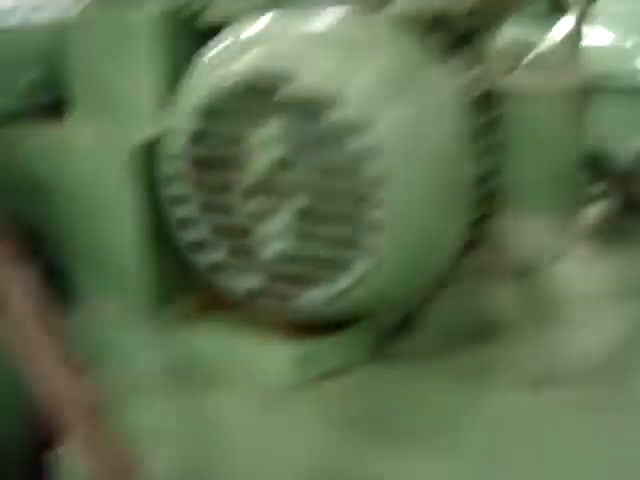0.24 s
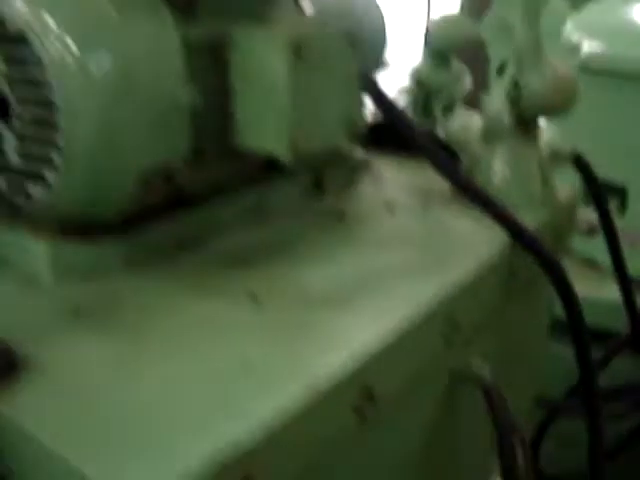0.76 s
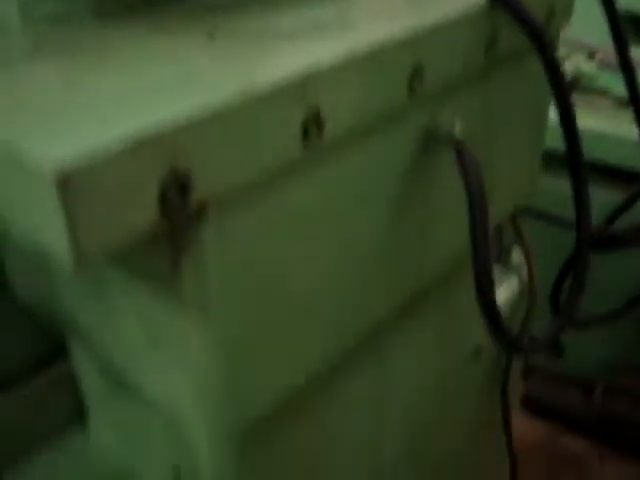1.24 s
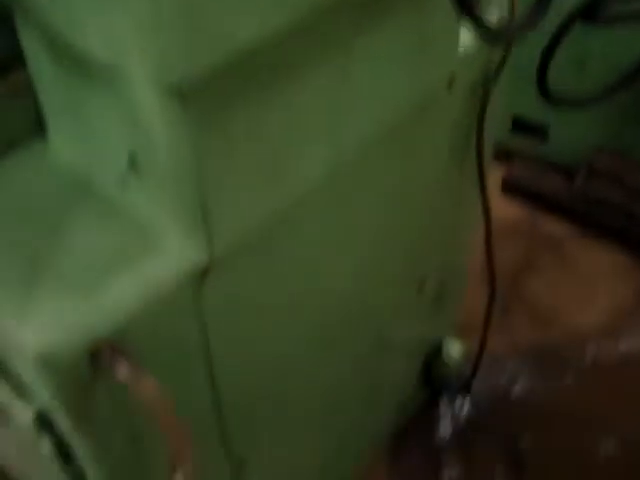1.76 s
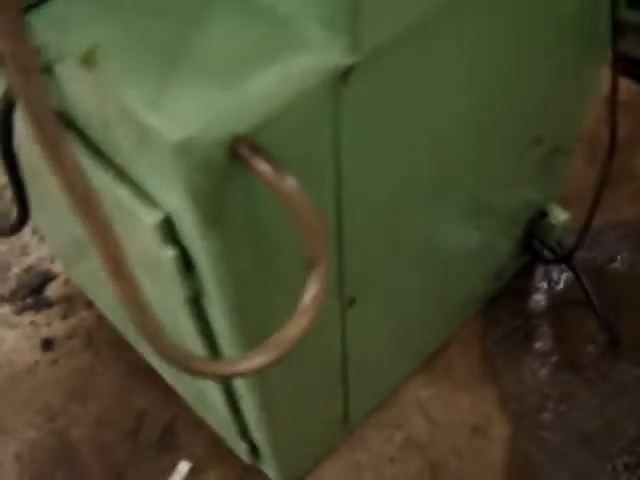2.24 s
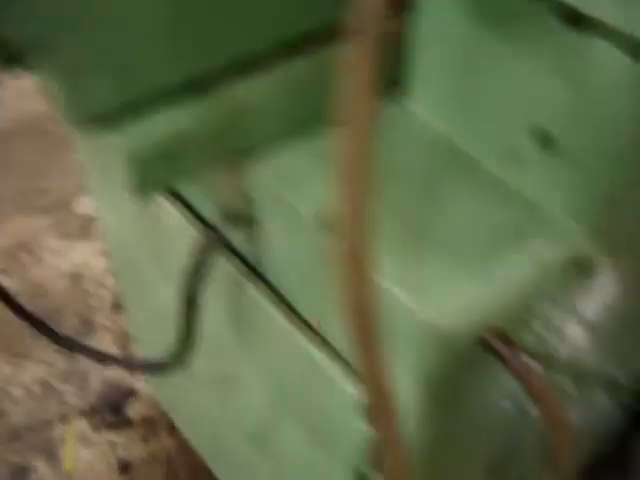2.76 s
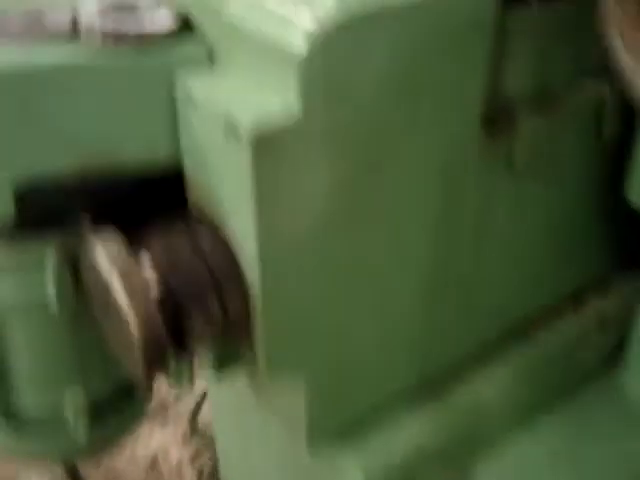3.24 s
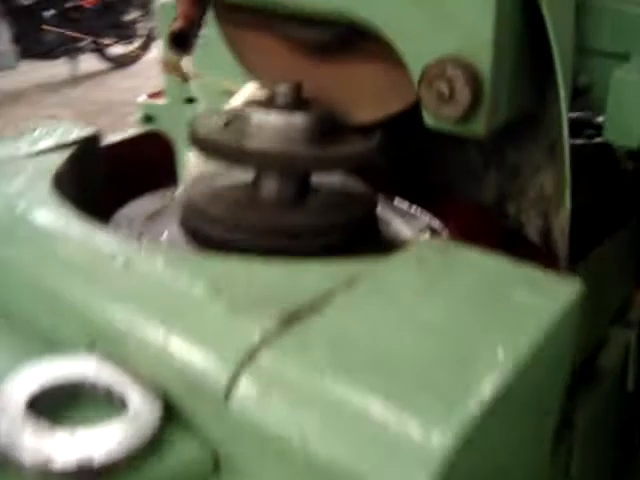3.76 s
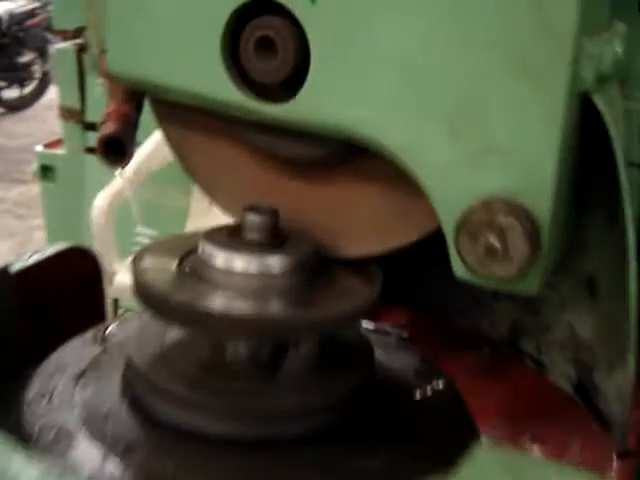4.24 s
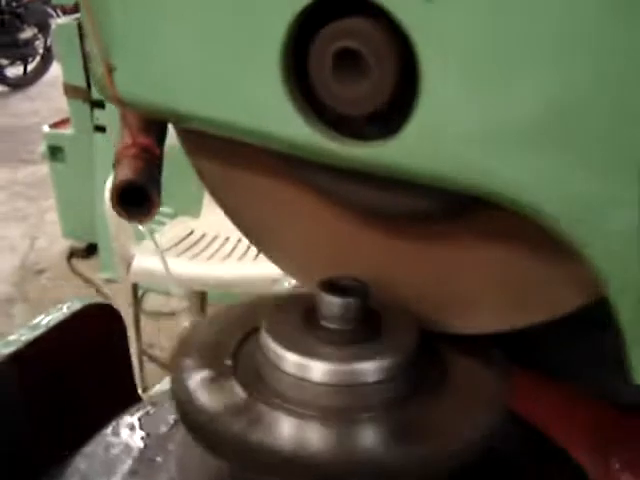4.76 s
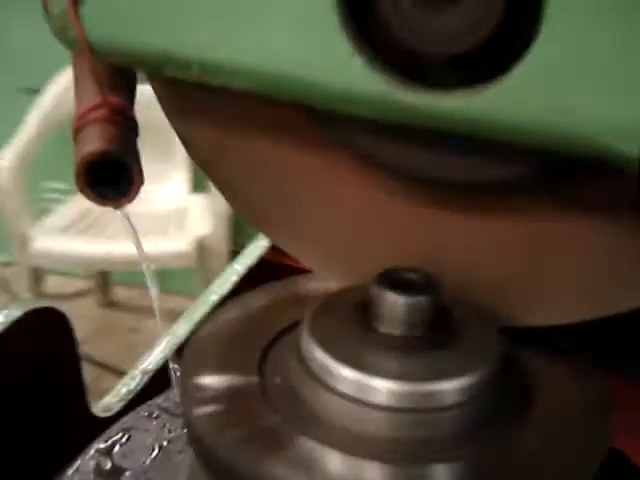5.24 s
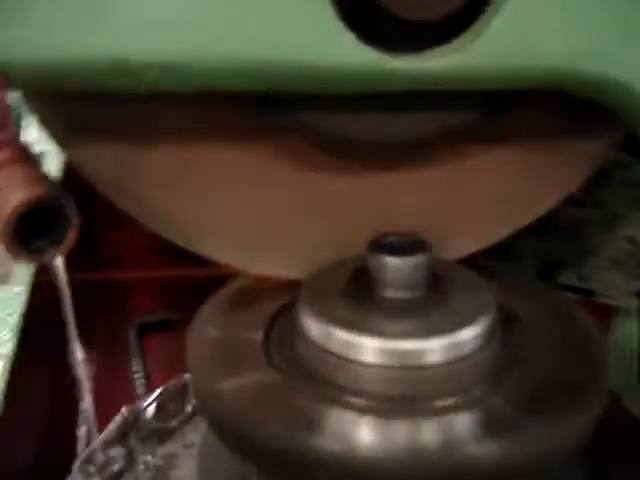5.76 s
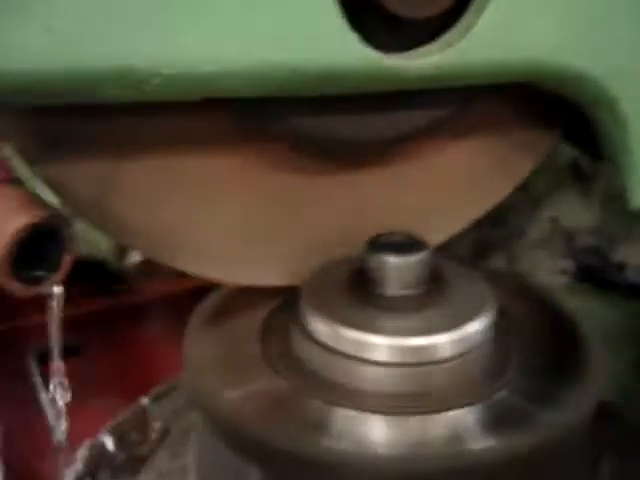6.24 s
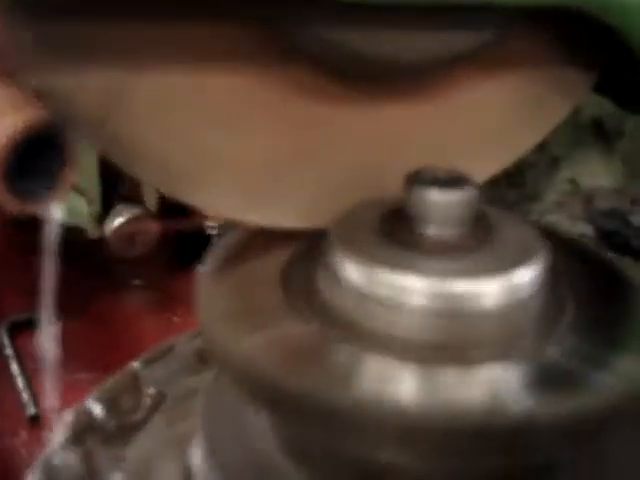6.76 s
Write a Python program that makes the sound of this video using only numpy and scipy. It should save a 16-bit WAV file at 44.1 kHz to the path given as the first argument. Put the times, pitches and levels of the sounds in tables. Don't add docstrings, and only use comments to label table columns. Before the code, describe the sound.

A grinding machine runs steadily in a workshop, its bright gritty wheel hiss over pump whine, casing drone and several held tones that swell and fade.

```python
import sys
import numpy as np
from scipy import signal
from scipy.fft import rfft, irfft, next_fast_len
from scipy.io import wavfile
from scipy.ndimage import uniform_filter1d, map_coordinates

SR = 44100
rng = np.random.default_rng(int(sys.argv[2]) if len(sys.argv) > 2 else 0)


def store_wav(level_fs):
    pcm = np.round(np.clip(np.atleast_2d(level_fs), -1, 1) * 32767)
    wavfile.write(sys.argv[1], SR, pcm.T.astype(np.int16))


def gain_from_decibels(decibels):
    exponent = np.asarray(decibels, float) / 20
    return 10 ** exponent


N = 309141
T_S = np.arange(N) / SR
BELT_HZ = 19.0

# t/s, near the wheel/0-1, beside the tank/0-1, guard opening in view/0-1
WALK = [(0, 0.4, .65, 0.62), (.5, 0.34, 0.56, 0.3), (1, 0.25, 0.69, 0.2), (1.5, .2, 0.81, 0.37),
        (2, 0.12, 0.87, 0.08), (2.4, 0, 0.86, 0.25), (2.8, 0.24, 1, 0.46), (3.15, 0.34, 0.75, 0.62),
        (3.5, .5, 0.56, 0.86), (3.85, 0.52, 0.36, 0.78), (4.2, 0.69, 0.44, 0.9), (4.55, 0.46, 0.14, 0.89),
        (4.9, 0.31, 0, 0.7), (5.25, .75, 0.08, 0.61), (5.6, 0.89, 0, .3), (6, 0.97, 0, 0.01),
        (6.4, 0.84, .03, 0.67), (7, 0.92, 0.22, 0.6)]


def unit(x):
    return x / np.sqrt(np.mean(x ** 2) + 1e-20)


def curves(rows):
    t_s, *columns = np.transpose(rows)
    return [np.interp(T_S, t_s, column) for column in columns]


def wobble(rate_hz):
    steps = np.arange(0, N + 32, 32)
    knots = rng.standard_normal(int(N * rate_hz / SR) + 4)
    return np.interp(np.arange(N), steps, map_coordinates(knots, [steps * rate_hz / SR]))


def filtered(x, response):
    m = next_fast_len(N + 8192)
    f_hz = np.fft.rfftfreq(m, 1 / SR) + 1
    return unit(irfft(rfft(x, m) * response(f_hz), m)[:N])


def shape(points):
    f_hz, db = np.transpose(points)
    return lambda hz: gain_from_decibels(np.interp(np.log(hz), np.log(f_hz), db))


def mode(hz, width_hz):
    return lambda f: (1j * f * width_hz / (hz * hz - f * f + 1j * f * width_hz)) ** 2


def patchy(depth_db):
    z = signal.stft(rng.standard_normal(N), nperseg=512)[2]
    field = uniform_filter1d(rng.standard_normal(z.shape), 3, 0)
    field = uniform_filter1d(field, 12, 1)
    return signal.istft(z * gain_from_decibels(depth_db * unit(field)), nperseg=512)[1][:N]


def tone(turns, db, flutter):
    sway_rad = flutter * wobble(14)
    gain = np.sqrt(2) * gain_from_decibels(db + 2.4 * flutter * wobble(9))
    return gain * np.sin(2 * np.pi * (turns + rng.random()) + sway_rad)


def grit(turns, memory_turns):
    pattern = rng.standard_normal((int(turns[-1]) + 3, 1024))
    pattern = uniform_filter1d(pattern, memory_turns, 0)
    return unit(pattern.ravel()[(turns * 1024).astype(int)])


def heard(rule):
    t_s, *view = np.transpose(WALK)
    far_db, *gained_db = rule
    return np.interp(T_S, t_s, far_db + np.dot(gained_db, view))


def zones(rows, floor_db=-58):
    t = np.arange(0, N + 256, 256) / SR
    power = gain_from_decibels(2 * floor_db)
    for centre_s, half_s, db in rows:
        power = power + gain_from_decibels(2 * db) * np.exp(-2 * ((t - centre_s) / half_s) ** 2)
    return np.interp(T_S, t, 10 * np.log10(power))


def air():
    # f/Hz, level/dB
    spectrum = [(1200, -22.5), (2500, 1.5), (4600, -4.5), (8000, -11), (10000, -10)]
    return gain_from_decibels(-30) * filtered(patchy(1.2), shape(spectrum))


def casing():
    # f/Hz, level/dB per Hz
    body_points = [(15, -59), (25, -42.5), (76, -30.5), (156, -28), (208, -16), (352, -15), (400, -5.5),
                   (471, -7), (506, -5), (641, -3), (768, -2.5), (888, -4.5), (1210, -11.5), (1350, -17),
                   (1900, -22.5), (2470, -44), (4180, -120)]
    # far/dB, gained near the wheel/dB, beside the tank/dB, guard in view/dB
    drone_rules = [
        (-43, .1, 11.5, .1),
        (-31, .1, 6.6, 2.8),
        (-38, .1, 12.5, 5.1),
        (-37, .1, 6.7, 1.4),
    ]
    # t/s, f/Hz, level/dB
    panel_a = [(0, 561, -30), (0.301, 575, -33), (0.701, 602.5, -25), (1.1, 615, -21.5), (1.35, 619, -28),
               (1.7, 663, -52), (2.2, 640, -64)]
    panel_b = [(0, 800, -45), (.5, 799, -25.5), (.9, 774, -30.5), (1.5, 790, -23), (2, 775, -29.5),
               (2.6, 766, -33), (3.2, 758, -40), (3.8, 760, -63)]
    panel_c = [(3.2, 1195, -50), (3.9, 1200, -31), (4.6, 1228, -34), (5.05, 1225, -32.5), (5.3, 1240, -51),
               (6, 1250, -40), (7, 1224, -37)]
    # centre/s, half length/s, level/dB
    squeal_zones = [
        [(.3, 0.4, -41.5), (.9, .2, -46), (1.6, 0.28, -50), (5, 0.34, -33), (5.55, 0.17, -34), (6.6, 0.56, -35)],
        [(.3, 0.34, -43), (2.4, 0.25, -47), (3.5, .4, -49), (4.9, .4, -45), (6.2, .25, -35), (6.7, 0.31, -31.5)],
    ]
    # centre/s, half length/s, level/dB
    fan_zones = [(0.02, 0.16, -36), (1.3, 0.61, -33.5), (2.3, 0.45, -35), (3.9, .4, -40), (4.8, .3, -43),
                 (6.4, 0.48, -50)]
    # f/Hz, unsteadiness
    thin_tones = [
        (8628, 1.3),
        (8965, 1.5),
        (407, 1.1),
    ]
    # f/Hz, centre/s, half length/s, level/dB
    hums = [(134.6, 2.1, 2.2, -57), (213, 2.35, 0.54, -40.5), (269.5, .8, 1.1, -46),
            (294, 2.7, 0.71, -39.5)]

    throb = np.cos(2 * np.pi * BELT_HZ * T_S)
    judder_db = 0.54 * wobble(16)
    body, edges_hz = shape(body_points), (20, 370, 900, 1300, 1900)
    throb_depths = (.03, 0.083, 0.086, 0.096)
    out = np.zeros(N)
    for lo, hi, rule, depth in zip(edges_hz, edges_hz[1:], drone_rules, throb_depths):
        def response(f):
            return body(f) / np.sqrt((1 + (lo / f) ** 12) * (1 + (f / hi) ** 12))
        band = filtered(patchy(0.95), response)
        out += gain_from_decibels(heard(rule) - 0.84 + judder_db) * band * np.exp(depth * throb)

    for panel in panel_a, panel_b, panel_c:
        hz, db = curves(panel)
        phase = 2 * np.pi * np.cumsum(hz) / SR
        ring = wobble(50) * np.cos(phase) + wobble(50) * np.sin(phase)
        out += gain_from_decibels(db) * ring * np.exp(0.61 * throb - .4)

    for hz, *zone in hums:
        out += tone(hz * T_S, zones([zone], floor_db=-81), 0.24)
    for (hz, flutter), rows in zip(thin_tones, [*squeal_zones, fan_zones]):
        out += tone(hz * T_S, zones(rows), flutter)
    return out


def spindle(turns):
    # centre/s, half length/s, level/dB
    order_zones = [
        [(.4, 0.42, -25.5), (1.75, 0.096, -35.5), (2.25, 0.2, -33), (3.3, .7, -29.5), (5, 1, -27.5),
         (6.4, 0.76, -26)],
        [(.45, 0.36, -38), (2, 0.45, -30.5), (2.9, 0.67, -28), (3.9, 0.89, -31), (5, 0.83, -30)],
        [(.55, .3, -35), (1.05, 0.21, -29), (1.7, .4, -40), (2.25, .2, -28.5), (2.75, .25, -32.5),
         (5, 0.9, -58), (6, 0.16, -41)],
    ]
    # centre/s, half length/s, level/dB
    shake_zone = [(1.1, 0.51, -51.5), (2.6, 1.2, -52.5)]
    # spindle order, behind/dB, in front/dB
    orders = [(3, -66, -68), (5, -51, -58), (6, -46, -52), (7.46, -60, -49), (11, -43, -42), (14, -46, -43),
              (20, -38, -46), (24, -50, -44), (25, -40, -52), (61, -43, -40), (63, -42, -41),
              (65, -41, -43), (90, -47, -41.5)]

    levels_db = [*map(zones, order_zones), zones(shake_zone, floor_db=-80.5)]
    out = sum(tone(k * turns, db, .15) for k, db in zip((12, 13, 18, 2), levels_db))
    out += tone(12 * turns + BELT_HZ * T_S, levels_db[1] - 4, .3)
    front, = curves([(2.6, 0.036), (3.8, 1)])
    for k, behind_db, front_db in orders:
        db = behind_db + (front_db - behind_db) * front + 1.4 * wobble(1.3) - .3
        out += tone(k * turns, db, 0.24 + 0.0026 * k)
    return out


def pump(turns):
    # centre/s, half length/s, level/dB
    tooth_zones = [
        [(.4, 0.71, -34.5), (2, 0.47, -35), (2.9, .5, -34.5), (4.5, .3, -40), (6.1, 1.6, -46.5)],
        [(1, 1.05, -35), (2.5, 0.4, -41.5), (4, 0.9, -37)],
        [(1, 0.31, -34), (2.9, 0.32, -38), (5.2, 1.7, -54.5)],
        [(.5, 0.56, -32.5), (1.4, 0.39, -34), (2.1, 0.39, -30.5), (2.85, 0.51, -33.5), (4.1, 0.53, -36.5),
         (6.6, 0.79, -41)],
        [(0.02, .2, -36), (.6, 0.31, -39), (2.3, 1, -40), (4.1, 0.67, -33.5), (5.6, .51, -39), (6.6, 0.52, -35)],
        [(.3, 0.9, -33), (1.5, 0.29, -35), (2.8, .51, -38.5), (4, 0.57, -37.5), (5.4, 0.43, -44)],
        [(1.3, 1.5, -37.5), (2.7, 0.73, -41.5), (4.1, .5, -37.5), (5, 0.28, -37.5)],
    ]
    # f/Hz, width/Hz
    guard_modes = [(2050, 570), (2710, 440), (3400, 470), (3960, 420)]
    # far/dB, gained near the wheel/dB, beside the tank/dB, guard in view/dB
    guard_rules = [(-29.5, -1.3, .1, 3.9), (-34.5, -1.4, .1, 11.5), (-31.5, -3, .1, .1),
                   (-45.5, 3.9, .1, 16.9)]

    tooth = 9.407 * turns
    levels_db = [zones(rows) for rows in tooth_zones]
    out = sum(tone(k * tooth, db, .15) for k, db in enumerate(levels_db, 3))
    out += tone(11 * tooth, levels_db[-1] - 10, .3)
    out += tone(12 * tooth, levels_db[-1] - 9, .3)
    for order in (94, 95):
        out += tone(order * turns, heard(guard_rules[3]) - 9.5, .7)
    knock = np.cos(2 * np.pi * 16.255 * T_S - 1.33)
    out *= 1 + 0.17 * knock

    runout = np.cos(2 * np.pi * turns)
    near, = curves([(2.8, 0.23), (4.2, 0.54)])
    knock_depths, runout_depths = (.65, .2, .25, .05), (.3, .55, .2, .1)
    for (hz, width_hz), rule, a, b in zip(guard_modes, guard_rules, knock_depths, runout_depths):
        shake = 0.82 * grit(turns, 12) + unit(patchy(2.46))
        ring = filtered(shake, mode(hz, width_hz))
        out += gain_from_decibels(heard(rule) - 3.0) * unit(ring * np.exp(near * (a * knock + b * runout)))
    return out


def wheel(turns):
    # f/Hz, width/Hz, level/dB at each of six camera places
    modes = [(5284, 300, -3, -10, -3.5, -1, -6, -8), (5498, 220, -1, -1.5, -3.5, -6, -1.5, -2.5),
             (5690, 295, 1.5, -5.5, -1.5, -5, 0, -16), (6170, 380, 1.5, -1, -5.5, 2, -3.5, 2.5),
             (6476, 240, -1.5, -6.5, -3.5, -4, 3.5, 3), (6604, 244, 1, 0, 5, 0, -2.5, 2),
             (6777, 330, -4, -7, 1, 3, -11.5, -15), (7220, 420, -12, -9.5, -9, -4.5, -11, -11),
             (7580, 330, -4.5, -17, -0.5, 4, -2.5, 11), (7980, 380, -14, -19.5, -2, -15, -5, -9),
             (8680, 440, -11, -17, -13.5, -20, -6, -10), (8960, 130, -21.5, -14.5, -17, -17, -15, -2.5),
             (9420, 270, -13, -23.5, -19.5, -16.5, -14, -6),
             (9700, 330, -18, -16.5, -16, -17.5, -11.5, -11)]
    place_s = [.35, 1.75, 3.45, 4.45, 5.55, 6.6]
    borders_hz = [5900, 7150, 8300]
    repeat_share = [0.55, 0.59, .3, 0.9]
    # far/dB, gained near the wheel/dB, beside the tank/dB, guard in view/dB
    hiss_rules = [(-31.5, 1, 0.11, 4.2), (-30.1, 6.5, .1, 1.13), (-41, 13, .1, 1.4), (-45.5, 14.5, .1, .1)]
    contact = [(1, .12, .1), (2, .08, .4), (3, .13, .1), (5, .12, .1)]
    # centre/s, half length/s, gain on low modes/dB
    presses = [
        (1.405, 0.52, 3),
        (3.7, 0.3, 2),
        (5.253, 0.66, 4.5),
    ]

    rubs = [np.sqrt(s) * grit(turns, 17) + np.sqrt(1 - s) * unit(patchy(0.84)) for s in repeat_share]
    bands, power = np.zeros((4, N)), np.zeros((4, N))
    for hz, width_hz, *place_db in modes:
        band = np.searchsorted(borders_hz, hz)
        gain = gain_from_decibels(np.interp(T_S, place_s, place_db))
        bands[band] += gain * filtered(rubs[band], mode(hz, 1.62 * width_hz))
        power[band] += gain ** 2

    facing, = curves([(0, .5), (2, .8), (3.3, 1.3), (5.4, 1.1), (6.2, .6)])
    feed_db = 0.3 * wobble(30)
    spin_rad = 2 * np.pi * 9.7 * T_S
    work = np.cos(spin_rad + 2.6) + .55 * np.cos(2 * spin_rad - 2)
    work = work * (0.14 + 1.3 * curves(WALK)[0] ** 2)
    press_db = sum(db * np.exp(-((T_S - s) / half_s) ** 2) for s, half_s, db in presses)

    out = np.zeros(N)
    for i, (rule, work_depth) in enumerate(zip(hiss_rules, (.17, .05, .05, .03))):
        rim = np.zeros(N)
        for times, *depths in contact:
            rim += depths[min(i, 1)] * np.cos(2 * np.pi * (times * turns + rng.random()))
        pressure = np.abs(1 + facing * rim + work_depth * work) * gain_from_decibels(feed_db)
        level_db = heard(rule) - 0.04 + press_db / (1 + 2.3 * i)
        out += gain_from_decibels(level_db) * unit(bands[i] / np.sqrt(power[i]) * pressure)
    return out


def scene():
    # t/s, f/Hz
    speed = [(0.0, 41.962), (0.5, 41.886), (1.0, 41.882), (1.5, 41.864), (2.0, 41.832), (2.5, 41.834),
             (3.0, 41.852), (3.5, 41.804), (4.0, 41.74), (4.5, 41.802), (5.0, 41.836), (5.5, 41.898),
             (6.0, 41.984), (6.5, 41.99), (7.0, 41.99)]
    turns = np.cumsum(curves(speed)[0]) / SR
    mono = air() + casing() + spindle(turns) + pump(turns) + wheel(turns)
    return np.array([mono, mono])


def starved(x, from_hz, need, top_need):
    hz, _, z = signal.stft(x, SR, nperseg=256, noverlap=192)
    slot = np.cumsum(rng.random(z.shape[1]) < .32)
    row = np.arange(len(hz)) // 3
    tile = row[:, None] * (slot[-1] + 1) + slot
    total = np.bincount(tile.ravel(), (np.abs(z) ** 2).ravel())
    own = (total / np.maximum(np.bincount(tile.ravel()), 1))[tile]
    usual = uniform_filter1d(own, size=80, axis=1)
    mood = rng.exponential(size=tile.max() + 1)[tile]
    lean = np.where(np.abs(hz - 5750) < 260, 1.8, .85)
    bar = (lean * np.where(hz > 9400, top_need, need))[:, None] * mood * usual
    gain = np.where((own < bar) & (hz > from_hz)[:, None], gain_from_decibels(-32), 1)
    return signal.istft(z * gain, SR, nperseg=256, noverlap=192)[1][:N]


def roll_off(x):
    return signal.sosfilt(signal.butter(12, 10170, fs=SR, output="sos"), x)


def record(dry):
    mono = starved(dry[0], from_hz=4900, need=.4, top_need=.55)
    mono = mono * np.clip((N - np.arange(N)) / 400, 0, 1)
    m = next_fast_len(N + 8192)
    over_hz = np.clip(np.fft.rfftfreq(m, 1 / SR) - 9950, 0, 600)
    limit = gain_from_decibels(-(over_hz / 38) ** 2)
    mono = irfft(rfft(mono, m) * limit, m)[:N]
    return roll_off(np.array([mono, mono]))


dry = scene()
out = record(dry)
store_wav(out)
```